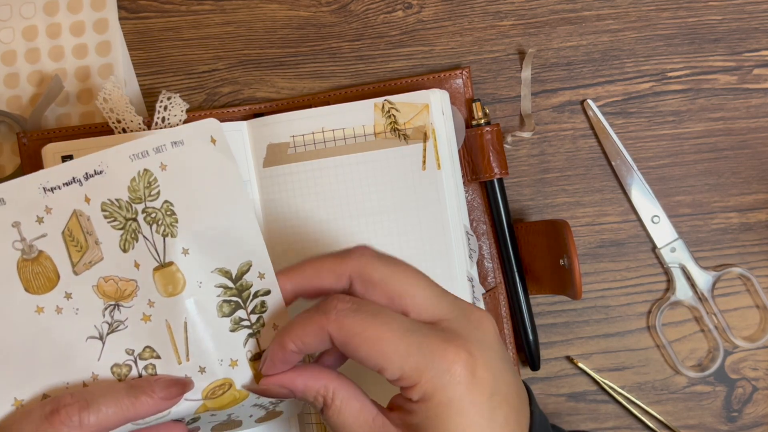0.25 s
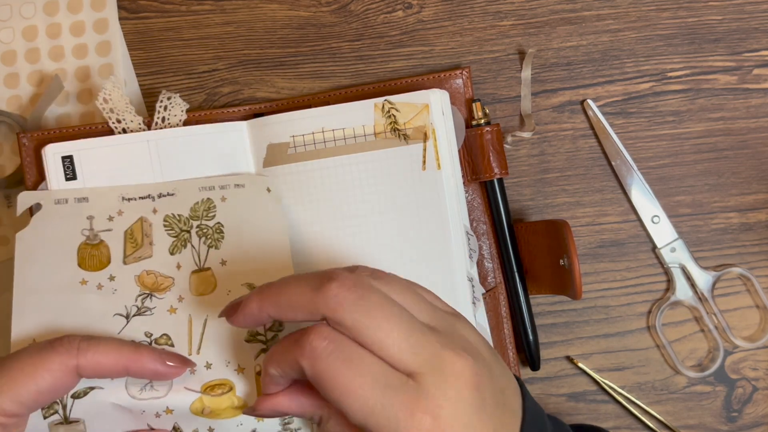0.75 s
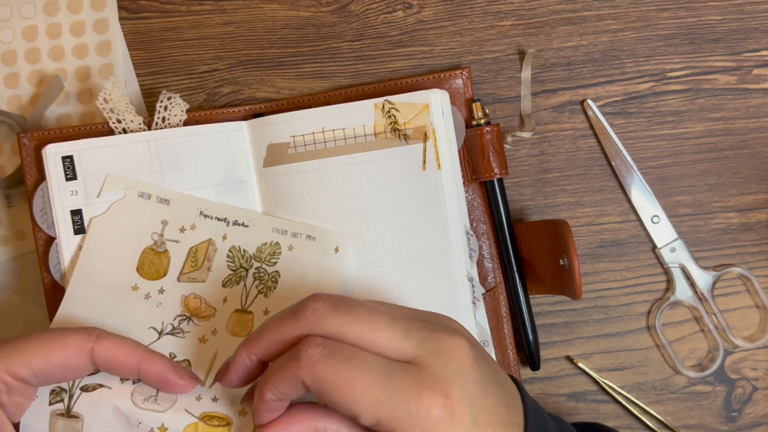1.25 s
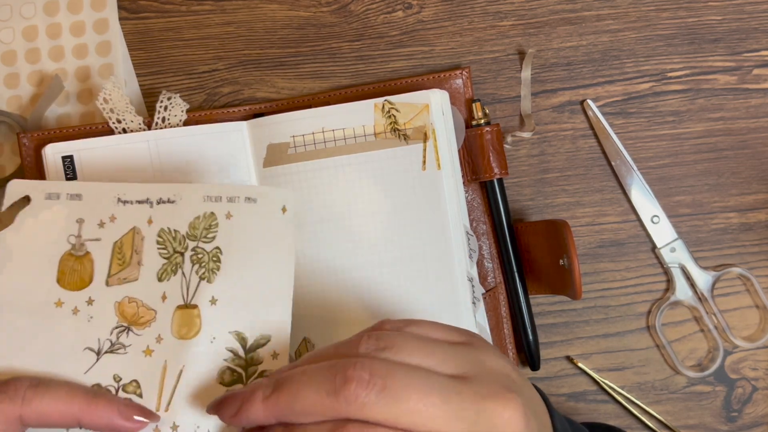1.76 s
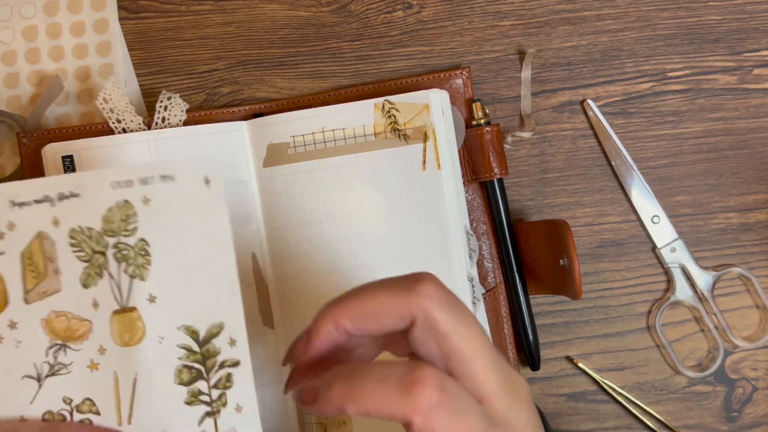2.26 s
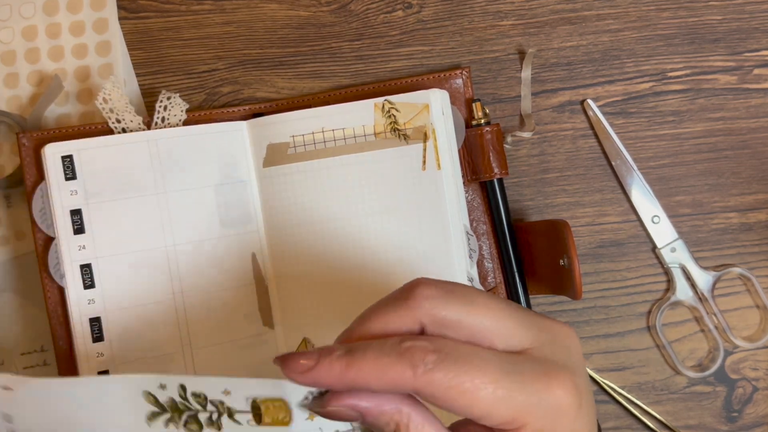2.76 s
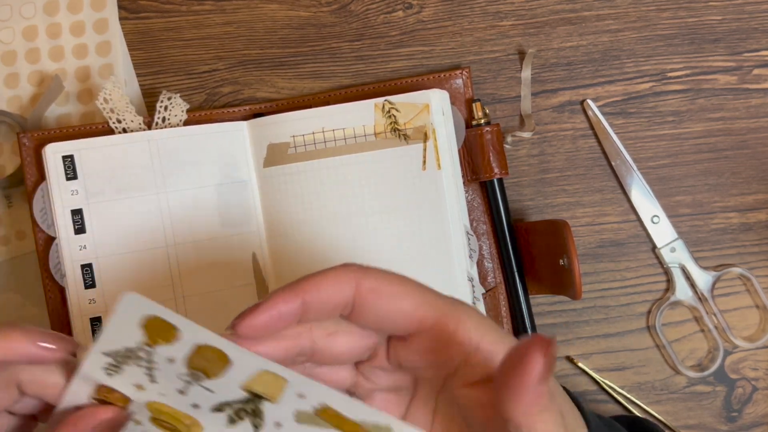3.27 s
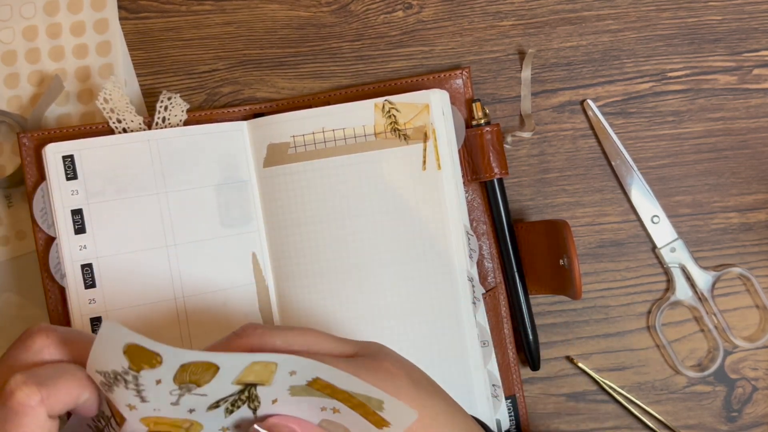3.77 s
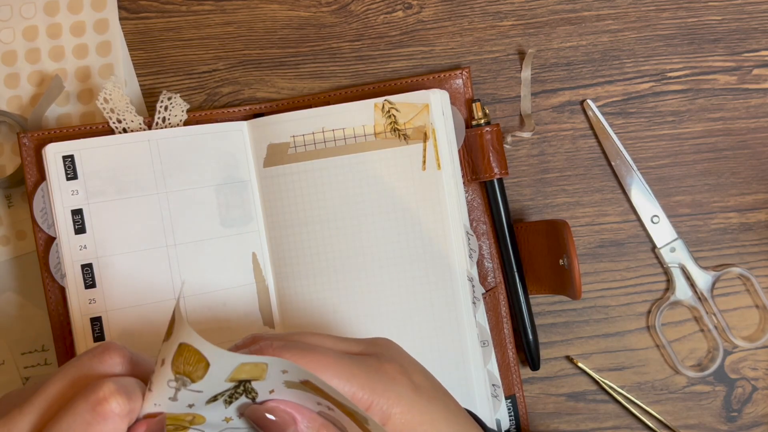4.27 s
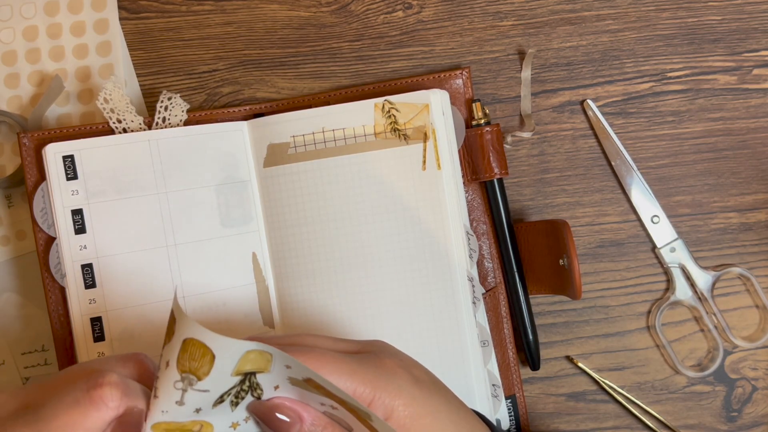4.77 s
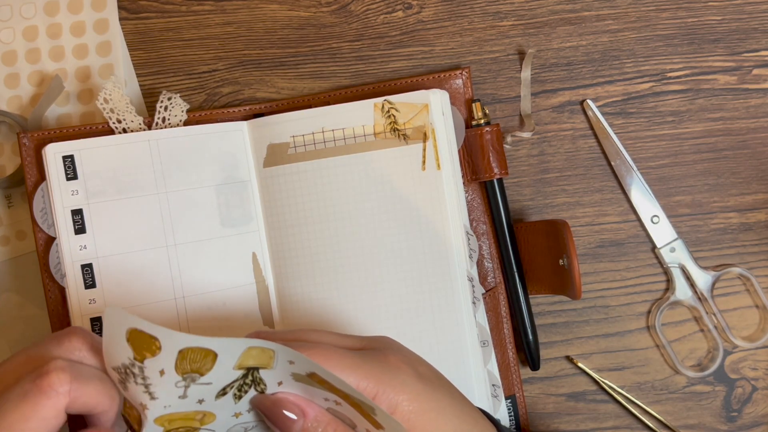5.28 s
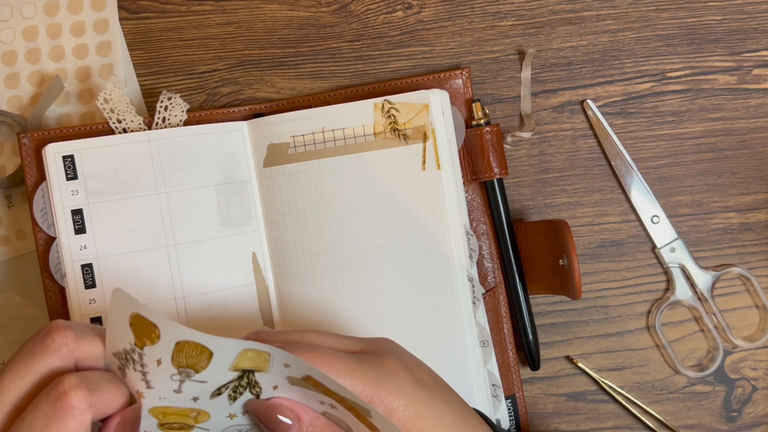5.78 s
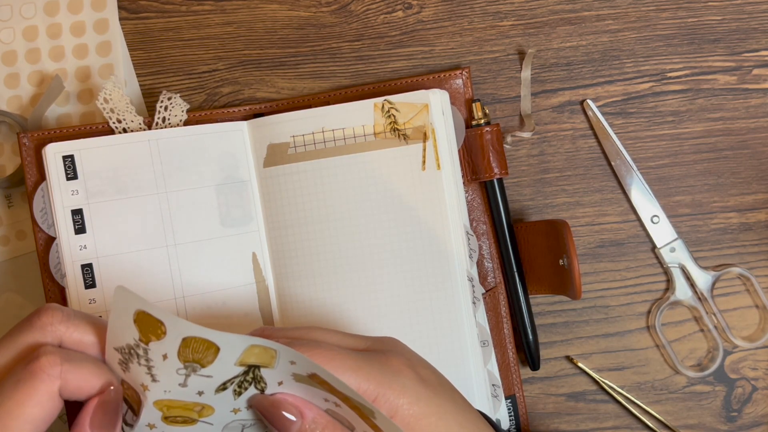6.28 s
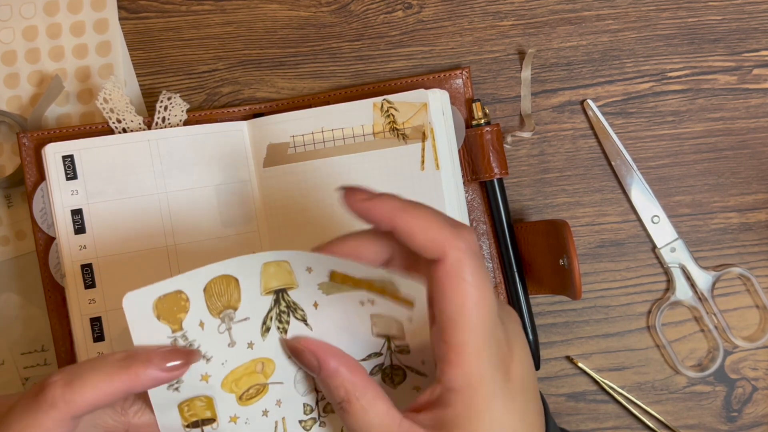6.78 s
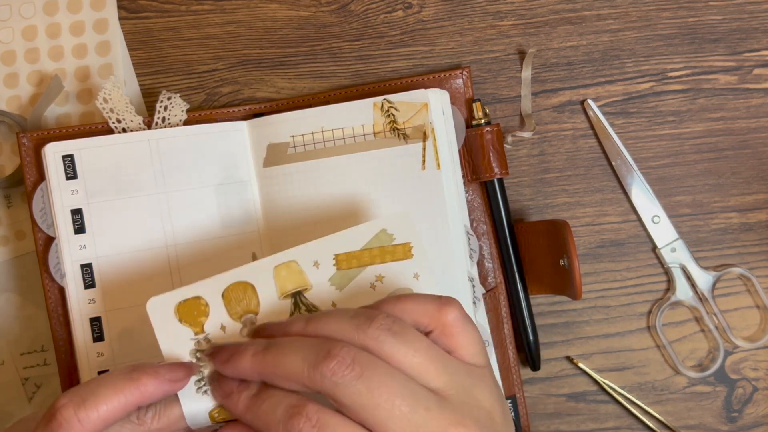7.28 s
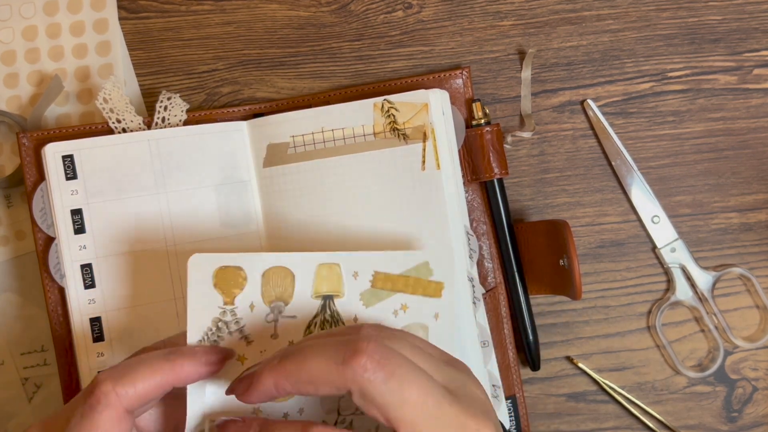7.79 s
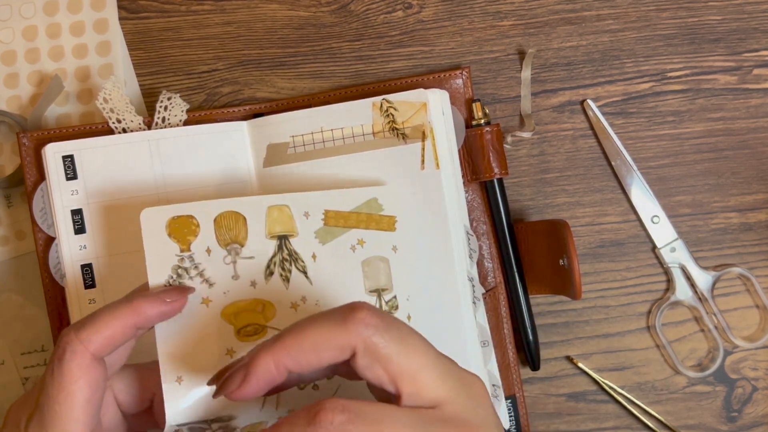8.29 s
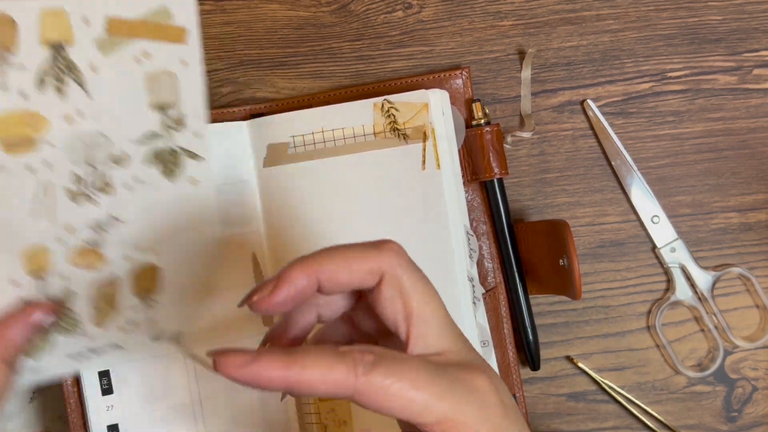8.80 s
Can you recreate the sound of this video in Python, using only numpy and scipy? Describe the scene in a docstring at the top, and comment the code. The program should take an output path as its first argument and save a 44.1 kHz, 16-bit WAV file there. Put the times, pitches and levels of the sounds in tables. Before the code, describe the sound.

Close stereo microphone in a small quiet room: hands shuffle glossy sticker sheets above an open notebook on a wooden desk. Gritty sliding hisses mix with edge taps and soft flaps, then quieter handling with sharp snaps. A sticker peels with a faint sinking squeak, the sheet twangs taut, and brisk rustling returns to the end over faint low rumble and hum.

```python
"""In a small quiet room, close over an open notebook on a wooden desk: filtered-noise rumble, air and hum
run throughout. From 0.14 s glossy sticker sheets slide on paper and skin: noise and random grains make a gritty
hiss. Snaps of the bent sheet, edge taps, soft pats and ticks soon join, as short noise bursts and swells.
At 4.7 s a sticker peels off with sinking modes; at 6.06 s the sheet twangs taut, a rising sine.
Busier strokes follow from 6.4 s to the end, and a faint room decay follows the paper."""
import sys
import numpy as np
from scipy import signal
from scipy.fft import rfft, irfft, next_fast_len
from scipy.io import wavfile
from scipy.ndimage import map_coordinates

SR = 44100
rng = np.random.default_rng(int(sys.argv[2]) if len(sys.argv) > 2 else 0)


def digitize_waveform(pressure):
    """Quantize a signal to 16-bit integers and store it at the path in sys.argv[1].

    Rows of a 2-D input are taken as channels; values are limited to [-1, 1].
    """
    field = np.atleast_2d(pressure).T
    bounded = np.clip(field, -1, 1)
    quanta = np.round(bounded * 32767).astype(np.int16)
    wavfile.write(sys.argv[1], SR, quanta)


N = 398840
TIME = np.arange(N) / SR
LEFT_RIGHT = np.array([[1], [-1]])


def from_db(db):
    """Decibels to amplitude."""
    return 10 ** (np.asarray(db) / 20)


def rms_one(x):
    """Scales a signal to rms 1."""
    return x / np.sqrt(np.mean(x ** 2) + 1e-20)


def at_hz(points, hz):
    """Reads a table on a log-frequency axis."""
    where, values = np.transpose(points)
    return np.interp(np.log(np.maximum(hz, 1)), np.log(where), values)


def band(x, edges, order=2):
    """Causal band-pass."""
    return signal.sosfilt(signal.butter(order, edges, "band", fs=SR, output="sos"), x)


def shaped_noise(gain_at):
    """Noise of rms 1 whose spectrum follows a function of frequency."""
    size = next_fast_len(N)
    spectrum = rfft(rng.standard_normal(size)) * gain_at(np.fft.rfftfreq(size, 1 / SR))
    return rms_one(irfft(spectrum, size)[:N])


def drift(rate_hz):
    """Slow chance of spread 1."""
    return shaped_noise(lambda hz: 1 / (1 + (hz / rate_hz) ** 2))


# colour of the room rumble and air, relative: pitch_hz, density_db (per Hz)
AIR_COLOUR = [(20, -14.5), (33, -3.5), (48, 7), (75, 0), (115, 4.5), (170, -11.5), (300, -20.5),
              (700, -28.5), (2000, -35), (6500, -41.5), (9000, -42), (16000, -52.5)]
AIR_DB, HUM_HZ, HUM_WIDTH_HZ, HUM_DB = -63.5, 120, 4.7, -70


def background(side_db=-19):
    """Low rumble and faint air, slightly different left and right, and a wavering hum: narrow-band noise."""
    mid, side = [shaped_noise(lambda hz: from_db(at_hz(AIR_COLOUR, hz))) for _ in range(2)]
    air = mid + from_db(side_db) * side * LEFT_RIGHT
    hum = shaped_noise(lambda hz: 1 / (1 + (2 * (hz - HUM_HZ) / HUM_WIDTH_HZ) ** 2))
    return from_db(AIR_DB) * air + from_db(HUM_DB) * hum


def gesture(start, end, attack_s, release_s):
    """A movement builds up quickly, holds and glides to a stop."""
    rise = np.clip((TIME - start) / attack_s + .5, 0, 1)
    return rise * np.exp(-np.clip((TIME - end) / release_s, 0, 5) ** 2)


# strokes of the sheet over paper and skin, before contact colouring: start_s, end_s, hiss_db,
# change_db (from start to end, rising or falling), weight_db (of the lows), sheen_db (of the top)
STROKES = [(0.144, 0.34, -56.5, -3.5, 6, -1), (0.403, 0.424, -59.5, -6, 18.5, -15),
           (0.486, 0.543, -58, -1.5, 6, 3), (0.577, 0.701, -66, 3.5, 4.5, 16.5),
           (0.749, 0.86, -61.5, -5, -11, 2), (0.877, 0.985, -60.5, 11, 11.5, -6),
           (1.026, 1.159, -64.5, -5, 2.5, 4), (1.193, 1.408, -66, -4, 0.5, 4),
           (1.422, 1.469, -54, -6, 3, 1), (1.526, 1.551, -65, -4.5, 7, -3),
           (1.759, 1.765, -67.5, -7.5, 8, 7), (1.853, 1.911, -65, 0.5, 6, -2),
           (2.008, 2.109, -69, 1.5, 0, -3), (2.252, 2.284, -72, -3, -7, 2), (2.37, 2.677, -55, 10.5, 1, 5),
           (2.695, 2.767, -56, 5, -9, 5), (2.837, 2.895, -54.5, -3, -1, -4),
           (3.031, 3.082, -51.5, 0, 8.5, -9), (3.124, 3.205, -55.5, -2.5, 2, 4.5),
           (3.276, 3.332, -67, -2.5, 1.5, 12), (3.391, 3.513, -62, -1, -21, 2),
           (3.515, 3.808, -58.5, -1.5, 5, 1), (3.85, 3.974, -61, 0.5, 0, 2),
           (4.06, 4.127, -58, 4, -9.5, -4), (4.209, 4.319, -60, -8, 2, -1.5),
           (4.499, 4.574, -62, -6, 4.5, -13.5), (4.767, 4.854, -56.5, -4, 6, -5),
           (4.878, 5.204, -61.5, 6, 0.5, -3.5), (5.329, 5.34, -74.5, 1, 9, 2.5),
           (5.473, 5.54, -64.5, 4.5, -3.5, 8.5), (5.612, 5.863, -63.5, 2, -2.5, -2),
           (5.928, 6.025, -67.5, -3, -4.5, 11.5), (6.222, 6.263, -69, 6, 1.5, -7.5),
           (6.422, 6.499, -68.5, 2.5, 4.5, 12), (6.512, 6.546, -59, 4.5, -0.5, -5),
           (6.562, 6.685, -53.5, 2.5, -9, 9), (6.697, 6.876, -51.5, 10, 1.5, -1),
           (6.884, 6.951, -53, 2, -16, -3), (7.057, 7.11, -54, -1, 1.5, 1.5),
           (7.136, 7.336, -55.5, 2, 0.5, -5), (7.398, 7.727, -62.5, 4.5, 3, 6),
           (7.725, 7.957, -55.5, 6.5, 0.5, -6), (7.99, 8.198, -58, -0.5, -4.5, 11.5),
           (8.218, 8.325, -56, -8, -3.5, 9), (8.327, 8.499, -51, -10.5, -1.5, 3.5),
           (8.533, 8.622, -58, 7.5, -7, -6), (8.64, 8.76, -53.5, -4.5, -17, 5),
           (8.799, 8.839, -57.5, 3, -40, 10), (8.918, 8.967, -65, 2, -15, 17)]
STROKE_ATTACK_S, STROKE_RELEASE_S = 0.025, .036
# the sheet's flutter and body against its hiss; the body takes a share of a stroke's weight
FLUTTER_DB, BODY_DB, BODY_WEIGHT_SHARE = -6, -3, 0.31


def strokes():
    """Power of the sliding movements in flutter, body, hiss and edge; pressure rises or falls along each stroke."""
    power = np.zeros((4, N))
    for start, end, db, change_db, weight_db, sheen_db in STROKES:
        along = np.clip((TIME - start) / (end - start), 0, 1) - .5
        pressure = from_db(db + change_db * along)
        movement = pressure * gesture(start, end, STROKE_ATTACK_S, STROKE_RELEASE_S)
        body_db = BODY_DB + BODY_WEIGHT_SHARE * weight_db
        colour = from_db([FLUTTER_DB + weight_db, body_db, 0, sheen_db])
        power += np.outer(colour ** 2, movement ** 2)
    return power


# the sheet's registers, from whole-sheet flapping up to single fibres: low_hz, high_hz
REGISTERS = [(180, 800), (820, 2400), (2400, 7600), (8000, 16000)]
# colour of the friction in each register: trim_db, grit_share (0-1)
FRICTION = [(-8, 0.5), (-2, 0.6), (-3.5, 0.42), (-22, 0.96)]
# the friction flickers: spread in each register (dB) and rate of the drift (Hz)
FLICKER_DB, FLICKER_HZ = (2.5, 1.5, 1.3, 1.5), 28


def sliding(flutter, body, hiss, edge, grains_per_s=2000, grain_spread_db=4.5,
            catch_hz=45, catch_db=1.2, firm_db=-60.0, brightening=.2):
    """Fibres catch and let go: countless tiny slips merge to a hiss, larger ones stand out as grit."""
    edge = edge + brightening * (hiss - firm_db)   # firm strokes are brighter
    catching = drift(catch_hz)   # the contact tightens and loosens
    born = rng.random(N) < grains_per_s * from_db(3 * catching) / SR
    sizes_db = grain_spread_db * np.minimum(rng.exponential(1, N), 4.5)
    sizes = from_db(sizes_db) * rng.choice([-1, 1], N)
    grains = born * sizes + 1e-18
    grit, smooth = [soft_touch(desk_echo(sheet(x)), hiss - firm_db)
                    for x in (grains, rng.standard_normal(N))]
    out = 0
    levels = (flutter, body, hiss, edge)
    for edges, level, (trim_db, share), flicker_db in zip(REGISTERS, levels, FRICTION, FLICKER_DB):
        mixed = np.sqrt(share) * grit + np.sqrt(1 - share) * smooth
        friction = rms_one(band(mixed, edges, order=3))
        flicker = flicker_db * drift(FLICKER_HZ)
        out = out + friction * from_db(level + trim_db + catch_db * catching + flicker)
    return out + flapping(flutter)


# broad resonances of the sheet above the desk: pitch_hz, width_hz, lift_db
SHEET = [(408, 53, 4), (590, 180, 8), (1090, 52, 6), (1270, 310, 8.5), (1586, 220, 5), (1860, 57, 5),
         (2340, 390, 3.5), (3180, 150, 2.5), (3523, 1700, 6.5), (7240, 2000, 3), (11060, 600, 2),
         (15000, 770, 3)]


def sheet(x):
    """Each resonance lifts its own part of the spectrum and rings briefly."""
    for hz, width, db in SHEET:
        b, a = signal.iirpeak(hz, hz / width, fs=SR)
        x = x + (from_db(db) - 1) * signal.lfilter(b, a, x)
    return x


def desk_echo(x, delay_s=0.000722, sway=.25, sway_hz=1.4, strength=0.55):
    """The desk returns the sound; as the sheet rises and sinks, the comb of peaks this makes moves."""
    late = np.arange(N) - SR * delay_s * np.exp(sway * drift(sway_hz))
    return rms_one(x + strength * map_coordinates(x, [late], order=3))


def soft_touch(x, firmness_db, dull_hz=5600, range_db=6.5):
    """A light touch glides without exciting the top of the hiss."""
    dull = signal.sosfilt(signal.butter(2, dull_hz, fs=SR, output="sos"), x)
    firm = .5 + .5 * np.tanh(firmness_db / range_db)
    # a second's shift makes the two frictions unrelated
    return np.sqrt(firm) * x + np.sqrt(1 - firm) * np.roll(dull, SR)


def flapping(flutter_db, low_hz=75, high_hz=210, trim_db=-7.5, linger_s=0.036):
    """The whole sheet pushes air; this soft low flap follows each movement and lingers."""
    keep = np.exp(-1 / (linger_s * SR))
    swing = signal.lfilter([1 - keep], [1, -keep], from_db(flutter_db + trim_db))
    return swing * rms_one(band(rng.standard_normal(N), (low_hz, high_hz)))


def in_hands(x, wander_hz=4, lag_samples=0.13, pan_db=-0.3):
    """The sounding spot wanders over the sheet, shifting lag and level between the microphone ports."""
    across = drift(wander_hz)
    ports = []
    for side in (.5, -.5):
        moved = map_coordinates(x, [np.arange(N) + side * lag_samples * across], order=3)
        ports.append(moved * from_db(side * pan_db * across))
    return np.array(ports)


# room decay: pitch_hz, t60_s
ROOM_T60 = [(150, 0.32), (1000, 0.18), (4000, 0.18), (8000, 0.16), (16000, 0.18)]
ROOM_DB, ROOM_GAP_S = -10, 0.00099


def room(x, apart=0.18):
    """Dense reflections, dying sooner in the treble than the lows; close-set ports hear nearly the same ones."""
    t = TIME[:SR // 2]
    white = rng.standard_normal(len(t)) + apart * rng.standard_normal(len(t)) * LEFT_RIGHT
    edges = np.geomspace(100, 17000, 8)
    tail = 0
    for low, high in zip(edges, edges[1:]):
        t60 = at_hz(ROOM_T60, np.sqrt(low * high))
        tail = tail + band(white, (low, high)) * from_db(-60 * t / t60)
    tail = tail * np.clip(t / ROOM_GAP_S - .5, 0, 1)   # fades in around the gap
    tail = tail / np.sqrt(np.sum(tail ** 2) / 2)
    return signal.fftconvolve(x[None], tail, axes=1)[:, :N]


def blows(table, colour_db, axis):
    """Rows of time, decay, pitch and four register levels: a kind's colour, tilted about its main register."""
    tilt_steps = np.arange(len(REGISTERS)) - axis
    rows = []
    for s, db, decay, hz, tilt in table:
        levels = db + np.array(colour_db) + tilt * tilt_steps
        rows.append([s, decay, hz, *levels])
    return np.array(rows)


# the bent sheet buckles: start_s, crack_db (before colour), decay_s (before stretching), ring_hz,
# tilt_db (towards the treble, per register)
SNAPS = [(.3347, -46, 0.0075, 3230, -8.5), (.5114, -47.5, .0038, 3630, 6.5),
         (.543, -49.5, 0.003, 6650, 12.5), (.6535, -51.5, 0.0018, 6440, -5.5),
         (2.6787, -40, 0.0043, 2700, -5.5), (4.2031, -26, 0.0021, 5340, -1.5),
         (4.384, -49.5, 0.014, 1220, -6.5), (5.0027, -47.5, 0.0021, 3700, 9.5),
         (5.0721, -43.5, 0.00075, 6550, -2.5), (5.0981, -27, .0014, 6240, 2.5),
         (5.8775, -43.5, 0.0035, 6630, -1), (6.0628, -32.5, .0013, 6600, 6),
         (6.1207, -31, 0.002, 4050, 0.5), (6.6888, -30.5, 0.0021, 5940, 1), (6.693, -35, 0.0022, 3020, -5),
         (7.8377, -50, 0.0015, 7360, -4.5), (7.8572, -44.5, 0.0095, 1680, -6.5),
         (8.341, -45.5, 0.0042, 1520, -8.5), (8.3531, -43.5, 0.0023, 4240, 6),
         (8.4308, -48, 0.0015, 6600, -1), (8.5097, -34.5, 0.0032, 1230, -6),
         (9.0026, -48, 0.0042, 3260, -9)]
SNAP_COLOUR_DB = [-22.5, -7.5, -1, -12.5]   # thump_db, body_db, crack_db, edge_db
SNAP_S = .01   # register levels of snaps, taps and ticks are rms over this time


def snap_rows():
    """Buckling is coloured about its crack register."""
    return blows(SNAPS, SNAP_COLOUR_DB, axis=2)


def buckle(decay_s, rise_s, size=4096):
    """A crease gives way in a run of tiny cracks that soon dies; all pitches get a nearly equal share."""
    t = TIME[:size]
    envelope = (1 - np.exp(-t / rise_s)) * np.exp(-t / decay_s)
    burst = rng.standard_normal(size) * envelope
    for _ in range(2):
        even = irfft(np.exp(1j * np.angle(rfft(burst))))   # flat spectrum, same phases
        burst = even * np.sqrt(envelope)
    return burst


def ringing(burst, hz, sharpness=4.5, lift_db=6, rim_echo=0.42):
    """The patch that gives way has a pitch of its own; an echo from the rim cuts uneven bands into it."""
    trip = int(rng.uniform(0.00029, .0012) * SR)
    burst = burst + rim_echo * np.pad(burst, (trip, 0))[:len(burst)]
    b, a = signal.iirpeak(hz, sharpness, fs=SR)
    return burst + (from_db(lift_db) - 1) * signal.lfilter(b, a, burst)


def dispersed(bursts, lag_s=0.00018):
    """Bending waves travel faster the higher their pitch; lag_s is the travel time at 1 kHz."""
    hz = np.fft.rfftfreq(bursts.shape[-1], 1 / SR)
    phase = 4 * np.pi * lag_s * np.sqrt(1000 * hz)
    return irfft(rfft(bursts) * np.exp(-1j * phase))


def snaps(rows, rise_s=0.00016, stretch=1.87, thump_stretch=2.7, early_s=0.00015):
    """Every snap, tap or tick shakes all registers of the sheet; the heavy low flapping lasts longest."""
    decays = np.maximum(rows[:, 1], .0005) * stretch

    def bursts_lasting(longer):
        bursts = [ringing(buckle(d * longer, rise_s), hz) for d, hz in zip(decays, rows[:, 2])]
        return dispersed(sheet(np.array(bursts)))

    quick, slow = bursts_lasting(1), bursts_lasting(thump_stretch)
    sounds = 0
    for edges, bursts, level in zip(REGISTERS, (slow, quick, quick, quick), rows[:, 3:].T):
        part = band(bursts, edges, order=3)
        rms = np.sqrt(np.sum(part ** 2, axis=1) / (SNAP_S * SR))
        sounds = sounds + part * (from_db(level) / rms)[:, None]
    out = np.zeros(N + SR)
    for s, sound in zip(rows[:, 0], sounds):
        start = int((s - early_s) * SR)   # the crease gives way just before its wave reaches the rim
        out[start:start + len(sound)] += sound
    return out[:N]


def straining(hits, hiss_db, lead_s=0.0049, below_db=-7.5, above_hiss_db=14.0):
    """A creeping crease crackles just before each snap or tap, limited by how much the sheet is moving."""
    swell = np.zeros(N)
    for s, decay, hz, thump, body, crack, edge in hits:
        at = int(s * SR)
        swell[at] = from_db(min(crack + below_db, hiss_db[at] + above_hiss_db))
    # run backwards, a decay becomes a build-up
    swell = signal.lfilter([1], [1, -np.exp(-1 / (lead_s * SR))], swell[::-1] + 1e-18)[::-1]
    return swell * rms_one(band(sheet(rng.standard_normal(N)), (1500, 8000)))


# an edge or fingertip knocks on the notebook: start_s, body_db (before colour),
# decay_s (before stretching), ring_hz, tilt_db (towards the treble, per register)
TAPS = [(.4003, -49.5, 0.011, 3030, -1), (.4859, -36.5, .0016, 3240, 6.5),
        (.4901, -38.5, 0.0023, 1830, -10), (.9914, -64, .0051, 514, 14.5), (1.421, -48, 0.003, 1740, 0),
        (1.4561, -36.5, 0.0019, 1450, -3.5), (1.4614, -50, 0.0062, 1440, -10.5),
        (1.5092, -48, 0.0024, 1470, -7.5), (1.732, -68, .0015, 1490, -4),
        (2.2008, -61.5, 0.0014, 1170, -10.5), (2.6911, -44, .0018, 1070, -6),
        (3.1292, -50, 0.0014, 1530, -3), (3.398, -62, 0.0017, 560, -12.5), (3.5664, -51, 0.0038, 1090, 5.5),
        (3.6155, -41, 0.0033, 1510, -2), (3.7542, -56, 0.0013, 1100, -11),
        (4.1976, -39, 0.00043, 1210, 1.5), (4.4765, -47.5, 0.0037, 1430, 3),
        (4.7297, -52.5, 0.0034, 1170, 0.5), (6.8645, -32.5, 0.002, 1740, 2.5),
        (6.8742, -41, 0.002, 1170, 1), (7.0596, -53.5, 0.0023, 2940, -8.5), (7.127, -41.5, 0.0015, 960, -6),
        (7.497, -52.5, 0.0014, 1160, -4), (7.7412, -48.5, 0.002, 1340, 0.5),
        (8.2197, -45.5, 0.0015, 1190, 1), (8.5218, -39.5, 0.00064, 1140, 0.5),
        (8.7378, -48.5, 0.0032, 865, 4), (8.783, -63, 0.0024, 760, -20), (8.993, -43.5, 0.002, 2090, 0)]
TAP_COLOUR_DB = [-8, -1, -10, -30]   # thump_db, body_db, crack_db, edge_db


def tap_rows():
    """Knocks are coloured about their body register, lower than the snaps."""
    return blows(TAPS, TAP_COLOUR_DB, axis=1)


# the sheet or a hand lands flat on the pages with a soft puff: start_s, flutter_db (before contact colouring)
PATS = [(.41, -65), (0.485, -41.5), (.525, -54.5), (.98, -65.5), (1.923, -48.5), (1.97, -58.5), (2.21, -63),
        (2.68, -51.5), (2.989, -48), (3.06, -58), (3.406, -54), (3.62, -60.5), (4.735, -57.5), (5.1, -62),
        (6.88, -48), (8.51, -50.5), (8.77, -49.5), (8.995, -50)]
PAT_ATTACK_S, PAT_DECAY_S, PAT_BODY_DB, PAT_HISS_DB = .008, 0.057, -9, -19.5


def pats():
    """Power of the soft landings, strongest in the flutter."""
    puffs = sum((from_db(db) * gesture(s, s, PAT_ATTACK_S, PAT_DECAY_S)) ** 2 for s, db in PATS)
    colour = from_db([0, PAT_BODY_DB, PAT_HISS_DB, PAT_HISS_DB])
    return np.outer(colour ** 2, puffs)


def handling(rest_db=-87.5):
    """Strokes and pats add up to levels of flutter, body, hiss and edge (dB); hands are never quite still."""
    return 10 * np.log10(from_db(rest_db) ** 2 + strokes() + pats())


# tiny creases give way with a crisp tick: start_s, crack_db (before colour)
TICKS = [(0.592, -58), (0.623, -57.5), (.64, -59.5), (3.039, -65), (4.9074, -63), (5.185, -58.5),
         (6.4981, -69), (7.815, -55), (8.0176, -52), (8.0454, -55.5), (8.059, -52.5), (8.1185, -53),
         (8.173, -56.5), (8.33, -55)]
# random ticks: steady average rate, and level against the hiss
TICKS_PER_S, TICK_DB = 10, -8
# every tick: decay before stretching, median pitch, tilt towards the treble per register
TICK_DECAY_S, TICK_HZ, TICK_TILT_DB = 0.0011, 4200, 2


def ticks(hiss_db, spread_db=1.0, pitch_spread=1.0, count=120):
    """Clear ticks, and random ones at a steady average rate with levels tied to the hiss; pitches vary."""
    times = np.cumsum(rng.exponential(1 / TICKS_PER_S, count))
    random_ticks = [(s, hiss_db[int(s * SR)] + TICK_DB + spread_db * size)
                    for s, size in zip(times, rng.standard_normal(count)) if SNAP_S < s < TIME[-1]]
    pitches = TICK_HZ * np.exp(pitch_spread * rng.standard_normal(len(TICKS) + count))
    pitches = np.minimum(pitches, SR / 4)
    table = [(s, db, TICK_DECAY_S, hz, TICK_TILT_DB) for (s, db), hz in zip(TICKS + random_ticks, pitches)]
    return blows(table, SNAP_COLOUR_DB, axis=2)


# the sticker peels off and the held sheet slackens: time_s, level_db, pitch_factor
PEEL = [(4.74, -84, 1.02), (4.8, -61.5, 1.06), (4.951, -70, 0.93), (5.06, -77, .975), (5.12, -96.5, .97)]
# modes of the held sheet at pitch factor 1: pitch_hz, level_db (relative)
HELD_MODES = [(1880, -17.5), (2300, 0), (2750, -8.5), (3330, 0.5), (4000, 3), (5220, -1)]


def peeling(width_hz=150):
    """Parting glue excites the taut sheet, whose modes sink as it slackens."""
    s, db, factor = np.transpose(PEEL)
    turns = np.cumsum(np.interp(TIME, s, factor)) / SR
    modes = sum(from_db(level) * drift(width_hz) * np.sin(2 * np.pi * hz * turns)
                for hz, level in HELD_MODES)
    return modes * from_db(np.interp(TIME, s, db)) * (TIME > s[0]) * (TIME < s[-1])


# the sheet springs taut and twangs: level_db (before the shiver), start_hz, end_hz, t60_s
TWANG = (-33.5, 1858, 2281, 0.15)
TWANG_S = 6.064


def twang(tighten_s=0.0154):
    """One bending mode rings on, rising in pitch as the tension returns."""
    db, start_hz, end_hz, t60 = TWANG
    t = np.maximum(TIME - TWANG_S, 0)
    hz = end_hz + (start_hz - end_hz) * np.exp(-t / tighten_s)
    shiver = 0.36 + .5 * drift(170)
    phase = 2 * np.pi * np.cumsum(hz * (t > 0)) / SR   # silent until the twang
    return shiver * from_db(db - 60 * t / t60) * np.sin(phase)


def scene():
    """The paper close by, its room sound, and the background."""
    flutter, body, hiss, edge = handling()
    hits = np.vstack([snap_rows(), tap_rows()])
    paper = sliding(flutter, body, hiss, edge) + straining(hits, hiss)
    paper = paper + snaps(np.vstack([hits, ticks(hiss)])) + peeling() + twang()
    return background() + in_hands(paper) + from_db(ROOM_DB) * room(paper)


# level between the two microphone ports: pitch_hz, left_over_right_db
PORT_BALANCE = [(50, 0), (200, 3), (500, 4), (800, 5), (1400, 5), (2000, 2.5), (2500, 0.5), (16000, -1.5)]
# phase between the ports: pitch_hz, left_lead_rad
PORT_PHASE = [(2000, 0), (3200, .6), (4600, 0), (8600, 0), (9850, -2.95), (10450, -3.3), (11800, -6.28),
              (12300, -6.28), (13500, -9.25), (14050, -9.6), (15300, -12.57)]
CUTOFF_HZ = 15900


def record(dry):
    """The microphone ports differ in level and phase; the top is cut steeply."""
    size = next_fast_len(N + 4096)
    hz = np.fft.rfftfreq(size, 1 / SR)
    balance = from_db(at_hz(PORT_BALANCE, hz) * LEFT_RIGHT / 2)
    lead = np.exp(1j * at_hz(PORT_PHASE, hz) * np.array([[1], [0]]))
    heard = irfft(rfft(dry, size) * balance * lead, size)[:, :N]
    return signal.sosfilt(signal.ellip(10, .2, 80, CUTOFF_HZ, fs=SR, output="sos"), heard)


dry = scene()
out = record(dry)
digitize_waveform(out)
```